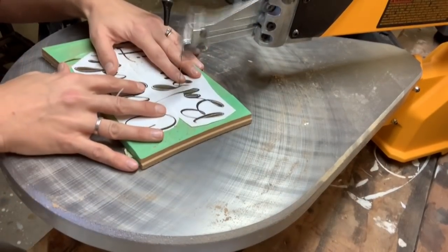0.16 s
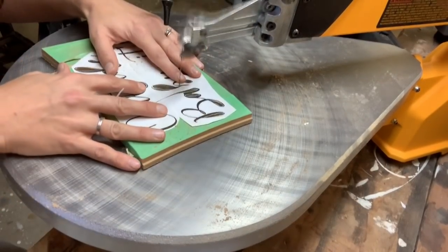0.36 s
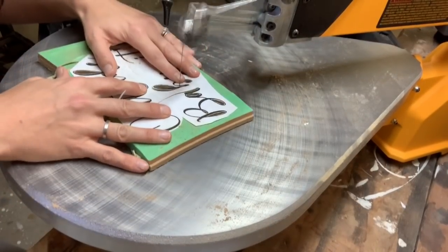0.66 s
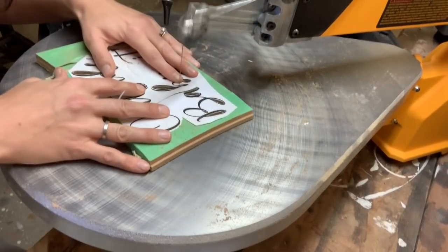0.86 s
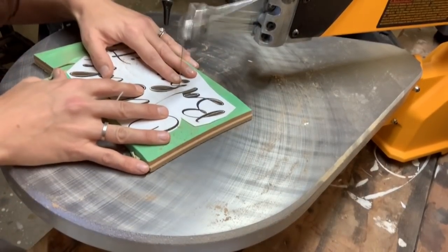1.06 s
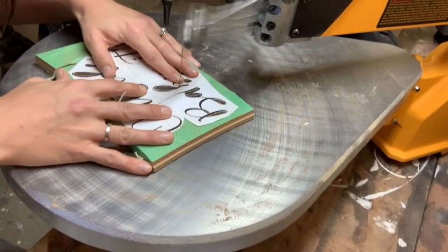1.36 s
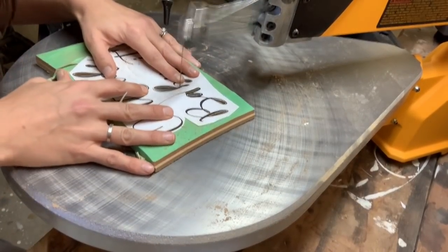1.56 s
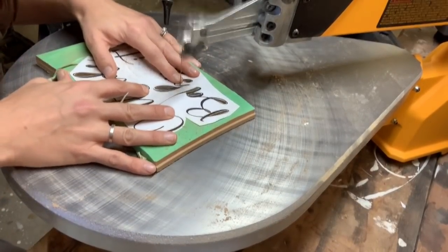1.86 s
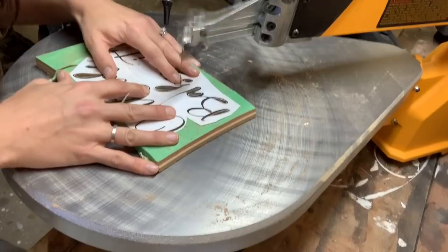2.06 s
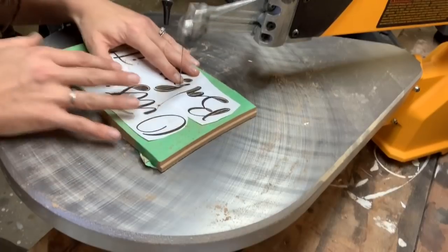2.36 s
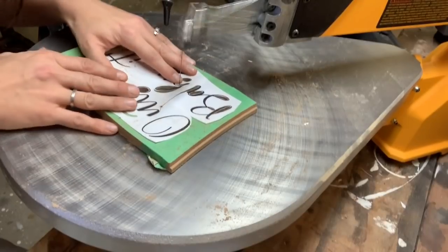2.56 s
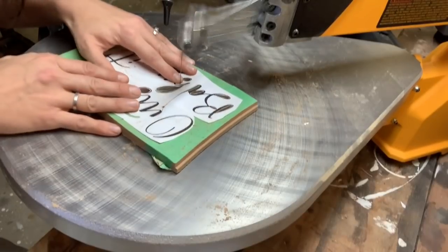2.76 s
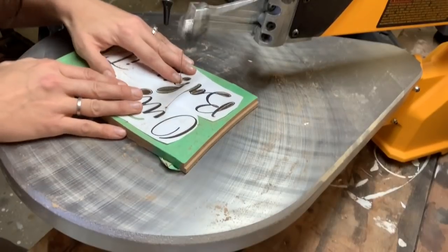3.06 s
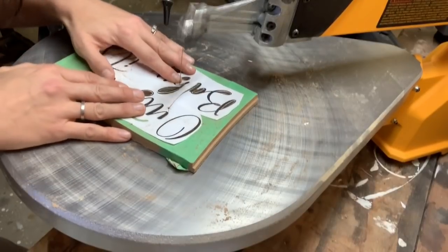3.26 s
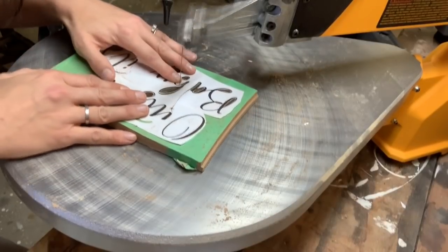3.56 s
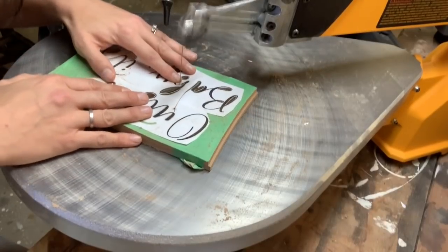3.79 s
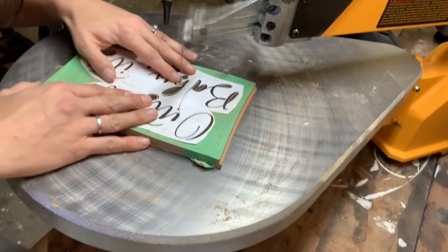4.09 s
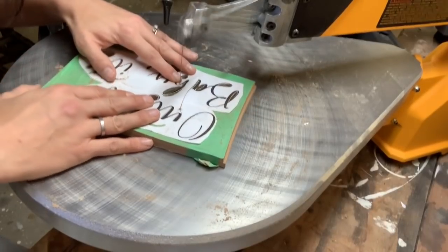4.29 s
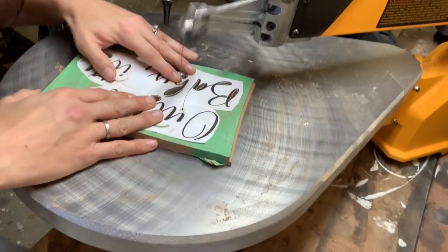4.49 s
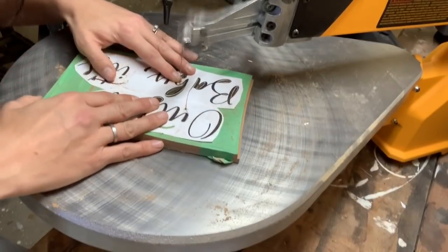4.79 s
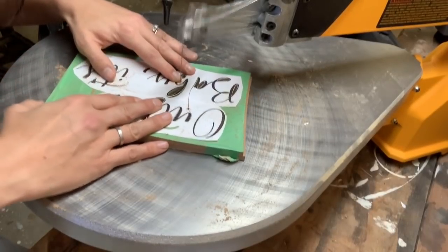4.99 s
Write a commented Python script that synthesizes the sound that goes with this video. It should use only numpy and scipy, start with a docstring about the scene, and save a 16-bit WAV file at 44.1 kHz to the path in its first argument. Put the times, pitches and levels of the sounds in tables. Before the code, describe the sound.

A scroll saw buzzes steadily up close, its fast rattling strokes easing near one second, then rasping through thin wood with brief squeaks.

```python
"""In a workshop, a scroll saw turns over about 24 times a second, close to a stereo microphone.
Crank knocks shake the cast frame as a stack of harmonics, the motor whines on a high multiple of the crank,
and the arm linkage rattles in step as bursts of coloured noise and ringing pivots.
Teeth rasp on each down and up stroke: hardly at all while the feed rests near one second, then steadily.
The board chatters, squeaks and briefly sings, bands of stroke noise pass by, and air washes steadily below."""
import sys
import numpy as np
from scipy import signal
from scipy.fft import rfft, irfft, next_fast_len
from scipy.io import wavfile
from scipy.ndimage import uniform_filter1d, map_coordinates

SR = 44100
rng = np.random.default_rng(int(sys.argv[2]) if len(sys.argv) > 2 else 0)


def transcribe(u):
    """Save the signal u as a 16-bit wav file named by the first command-line argument.

    u: samples, shape (n,) or (channels, n), limited to [-1, 1]; the rate is SR.
    q: integer samples, one column per channel.
    """
    v = np.clip(np.atleast_2d(u).T, -1, 1)
    q = np.round(v * 32767).astype(np.int16)
    wavfile.write(sys.argv[1], SR, q)


N = 226445

# Crank speed. Each row: time in seconds, turns a second.
SPEED = [(0.0, 24.752), (0.35, 24.595), (0.9, 24.684), (1.3, 24.657), (1.7, 24.512), (2.1, 24.361),
         (2.6, 24.433), (3.3, 24.371), (4.2, 24.381), (5.13, 24.373)]
# How fast the board is fed into the teeth. Each row: time in seconds, dB against a steady cut.
FEED = [(0, -11.5), (0.24, -5), (0.6, 1), (0.69, -2.5), (0.78, -12), (1.05, -18), (1.3, -8.5), (1.52, -1.5),
        (1.85, 1), (2.15, 1.5), (2.42, 1), (2.54, -4.5), (2.73, 3.5), (3.0, 2.5), (3.35, -1.3), (4.3, -2),
        (4.9, -1.5), (5.13, 1)]
# How hard the hands bear on board and blade, which loads the drive. Each row: time in seconds, dB.
LOAD = [(0, -5), (1.35, -5), (1.7, 0.9), (2.6, -1), (3.3, 1), (4.4, 3.5), (5.13, 3)]
# The microphone ports lie apart and oppose each other near 9 kHz.
# Each row: Hz, left-right correlation (-1 to 1).
PORTS = [(100, 0.87), (300, 0.61), (500, -0.18), (1000, -0.11), (1400, 0.21), (2400, 0.21), (2850, -0.4),
         (3400, 0.24), (4600, 0.43), (6900, 0.3), (8300, -0.99), (10000, -0.98), (12700, 0.95), (15000, 1)]


def amp(db):
    """Decibels to gain."""
    return 10 ** (np.asarray(db) / 20)


def unit(x):
    """Scale to rms 1."""
    return x / np.sqrt(np.mean(x ** 2) + 1e-20)


def along(points, hz):
    """Read (Hz, value) points on a log axis."""
    f, v = np.transpose(points)
    return np.interp(np.log(hz + 1), np.log(f + 1), v)


def curves(rows):
    """One value per sample for each column after the time."""
    s, *cols = np.transpose(rows)
    return [np.interp(np.arange(N) / SR, s, c) for c in cols]


def wobble(rate):
    """A smooth random curve, rate knots a second."""
    knots = rng.standard_normal(int(N * rate / SR) + 4)
    return map_coordinates(knots, [np.arange(N) * rate / SR])


def swell(middle, length):
    """A smooth rise to 1 and fall; length is taken at half height."""
    return .5 ** ((2 * (np.arange(N) / SR - middle) / length) ** 2)


def swells(rows):
    """The summed dB of (middle, length, dB) swells."""
    return sum(db * swell(middle, length) for middle, length, db in rows)


def effort(steady_db, per_feed, per_load):
    """The level in dB of a sound that follows feed and load, in dB per dB of each."""
    return steady_db + per_feed * curves(FEED)[0] + per_load * curves(LOAD)[0]


def filtered(x, response):
    """x times a response of frequency."""
    m = next_fast_len(N + SR // 2)
    return irfft(rfft(x, m) * response(np.fft.rfftfreq(m, 1 / SR)), m)[..., :N]


def radiate(pair, spectrum, left_db, direct=0.46):
    """Colour two excitations and spread them over the ports, at rms 1; left_db is left against right."""
    def angle(hz):
        return np.arccos(np.clip(along(PORTS, hz), -1, 1)) / 2

    # reflections make the same sound lead at one port or the other, differently for each frequency and source
    leads = rng.standard_normal(200)
    lead_hz = np.linspace(0, SR / 2, len(leads))
    turned = filtered(pair[0], lambda hz: 1j * np.sign(np.interp(hz, lead_hz, leads)))
    share = np.clip(direct, 0, 1)
    pair = np.array([pair[0], np.sqrt(share) * turned + np.sqrt(1 - share) * pair[1]])
    mid, side = filtered(pair, lambda hz: amp(along(spectrum, hz)) * [np.cos(angle(hz)), np.sin(angle(hz))])
    return unit(np.array([mid + side, mid - side]) * amp([[left_db], [0]]))


def contacts(turns, repeat, spiky_db, memory_s, size=1800):
    """Tiny impacts: a share recurs at the same crank angle and slowly wears into a new pattern, the rest is fresh."""
    place = (turns % 1 * size).astype(int)
    age = np.arange(N) / SR / max(memory_s, .1)
    era, blend = age.astype(int), age % 1 * np.pi / 2
    patterns = rng.standard_normal((2, 64, size))
    recurring = np.cos(blend) * patterns[:, era, place] + np.sin(blend) * patterns[:, era + 1, place]
    fresh = unit(rng.standard_normal((2, N)) * amp(spiky_db * wobble(1500)))
    share = np.clip(repeat, 0, 1)
    return np.sqrt(share) * recurring + np.sqrt(1 - share) * fresh


def strokes(turns, first, second, width, second_db, rest_db, scatter_db):
    """Two bursts a turn, centred on the given crank angles (turns), each of a slightly new strength and shape."""
    angle = turns + .006 * wobble(60)

    def burst(centre):
        offset = (angle - centre + .5) % 1 - .5
        return np.exp(-np.abs(offset / width) ** 3)

    envelope = burst(first) + amp(second_db) * burst(second) + amp(rest_db)
    return unit(envelope * amp(scatter_db * wobble(50)))


def ring(x, t60, wet_db):
    """The board and the metal table ring on briefly, in many close modes heard as a decaying noise tail."""
    t = np.arange(SR // 5) / SR
    tail = rng.standard_normal((2, len(t))) * amp(-60 * t / t60)
    tail /= np.linalg.norm(tail[0])
    return unit(x + amp(wet_db) * signal.fftconvolve(x, tail, axes=1)[:, :N])


def narrow(pair, hz, width):
    """One resonance of rms 1 whose frequency may move."""
    carrier = np.exp(2j * np.pi * np.cumsum(hz * np.ones(N)) / SR)
    pole = np.exp(-np.pi * width * 1.5 / SR)
    # shift the resonance down to 0 Hz, smooth it there with a double pole, and shift it back
    smoothed = signal.lfilter([1], np.poly([pole, pole]), pair / carrier)
    return unit(np.real(smoothed * carrier))


def resonate(pair, modes, shift_db, rate):
    """Narrow resonances, each waxing and waning by itself, spread over the ports at rms 1."""
    out = sum(amp(db + shift_db * wobble(rate)) * narrow(pair, centre, width) for centre, width, db in modes)
    return radiate(out, [(1000, 0)], left_db=1.5)


def frame(turns, scatter, waver_db, stir, ring_order=5):
    """Crank knocks shake the frame at multiples of its speed; the motor's supply ripple beats slowly with them."""
    # Shakes of frame and motor. Each row: multiple of the crank speed, left dB, right dB.
    shakes = [(1, -55, -44.5), (2, -43, -36), (3, -42.5, -40), (4, -47.5, -47), (5, -43, -31.5),
              (6, -39.5, -40.5), (7, -67, -36.5), (8, -39.5, -42), (9, -49.5, -43), (10, -47, -57.5),
              (11, -54, -48), (12, -46, -54), (13, -48.5, -61), (14, -44, -63), (15, -60, -87),
              (16, -46, -64), (17, -44, -59), (18, -38, -79), (19, -50.5, -55), (22, -61, -52),
              (23, -50.5, -49), (24, -50, -68), (25, -51, -58), (27, -61, -50), (28, -51.5, -66)]
    # Load shifts the shakes. Each row: multiple of the crank speed, dB in a steady cut, dB per dB of load.
    strain = [(2, -0.5, 0), (4, -1, -0.9), (5, 0.5, 0.36), (6, 0, -0.3), (7, -3, 0), (8, -0.5, 0.77),
              (9, -1.5, 0.5), (22, -1, 0), (32, -2, 0.5)]
    # A shake swells or ebbs for a moment. Each row: middle in seconds, length in seconds, multiple, dB.
    surges = [(0.82, 0.25, 2, -5), (1.33, 0.36, 2, 2), (2.33, 0.23, 2, -8), (2.95, .25, 2, -3),
              (1.5, 0.22, 6, -5), (2.18, 0.2, 6, -14), (2.24, 0.5, 7, 5.5), (1.4, 0.52, 5, 2),
              (3.06, 0.35, 5, 2.5), (2.31, 0.34, 5, 2.5), (0.4, 0.62, 16, 3)]
    # Shakes that throb with the slow beat.
    # Each row: multiple of the crank speed, depth (negative = against the beat).
    ripple = [(4, 0.27), (5, 0.18), (6, 0.34), (7, 0.067), (9, 0.14), (17, -0.0074), (18, 0.031),
              (22, -1.2)]
    # Knocks of the drive in each turn. Each row: crank angle in turns, dB.
    knock_angles = [(.09, 0), (.28, -1), (.47, -8), (.715, -1)]
    # Steady hum of the motor and its stand. Each row: Hz, dB.
    hum = [(67.6, -44.5), (78.5, -55), (240, -53)]
    ripple_hz, in_step_s = 120, 4.37  # the ripple is in step with the fifth multiple at that moment

    out = np.zeros((2, N))
    t = np.arange(N) / SR
    load_db = curves(LOAD)[0]
    strain_db = {round(k): db + slope * load_db for k, db, slope in strain}
    throb = {round(k): depth for k, depth in ripple}
    beat = 5 * turns - ripple_hz * t
    beat = 2 * np.pi * (beat - np.interp(in_step_s, t, beat))
    slack = amp(-.6 * load_db)
    weight_db = .7 * slack * wobble(24)
    for order, left_db, right_db in shakes:
        k = round(order)
        lag = np.arccos(np.clip(along(PORTS, k * SPEED[-1][1]), -1, 1))
        # multiples far from the frame's main ring arrive less in step; higher ones flutter more
        loose = np.sqrt(k) * slack
        push = sum(amp(db) * np.exp(2j * np.pi * (1 / 4 - k * angle)) for angle, db in knock_angles)
        offset = scatter * abs(k - ring_order) * rng.normal()
        phase = np.angle(push) + 2 * np.pi * (k * turns + offset) + stir * loose * wobble(15)
        surge_db = swells([(s, length, db) for s, length, multiple, db in surges if round(multiple) == k])
        level = amp(strain_db.get(k, 0) + surge_db + weight_db + waver_db * loose * wobble(10))
        phase = np.array([phase, phase + lag])
        shake = np.sin(phase) + throb.get(k, 0) * np.sin(phase - beat)
        out += amp([[left_db], [right_db]]) * level * shake
    for hz, db in hum:
        out += amp(db) * np.sin(2 * np.pi * (hz * t + rng.random()) + .3 * wobble(4))
    return np.sqrt(2) * out  # table levels are rms


def whine(turns, order=32):
    """The motor whines on one high multiple of the crank, swelling each time it reverses the arms."""
    # One row: dB in a steady cut, dB per dB of load, depth of the throb twice a turn.
    whine_law = (-38.7, .4, .35)
    steady_db, per_load, depth = whine_law
    load_db = curves(LOAD)[0]
    throb = 1 + depth * np.cos(4 * np.pi * (turns - .18)) + depth / 2 * np.cos(2 * np.pi * (turns - .7))
    # it wavers more while the drive runs slack
    phase = 2 * np.pi * order * turns + .25 * amp(-load_db) * wobble(14)
    level = amp(steady_db + per_load * load_db + 0.7 * wobble(10))
    return np.sqrt(2) * level * throb * np.sin([phase, phase + 1.33])


def linkage(turns):
    """The arm pivots knock as the blade reverses at top and bottom; the arms ring and the pivots jingle with it."""
    # Colour of the knocks. Each row: Hz, relative dB.
    knock_colour = [(45, -30), (75, -7), (110, -1), (220, -3), (330, -2), (440, 2), (475, -6), (515, -9),
                    (550, 3), (700, 1), (840, 1), (950, -3), (1500, -6), (1900, -11), (3000, -19),
                    (8000, -37)]
    # Jingling of the loose pivots. Each row: Hz, width in Hz, dB.
    pivots = [(1200, 280, -9), (1807, 75, -0.5), (2112, 74, -1), (2415, 100, -10), (2970, 190, -12),
              (3384, 150, -2.5)]
    knocks = strokes(turns, first=0.19, second=0.72, width=0.084, second_db=1.5, rest_db=-3, scatter_db=2.5)
    play = contacts(turns, repeat=0.59, spiky_db=3.0, memory_s=1.52)
    rattle = radiate(knocks * play, knock_colour, left_db=-1.0)
    arm_hz = 432 * (1 + 0.03 * wobble(7))
    arm_modes = [(arm_hz, 24, 3), (565, 40, -2), (700, 70, -3)]  # Hz, width in Hz, dB
    arms = resonate(knocks * rng.standard_normal((2, N)), arm_modes, shift_db=1.8, rate=15)
    jingle_hits = knocks * contacts(turns, repeat=.4, spiky_db=4, memory_s=0.93)
    jingle = resonate(jingle_hits, pivots, shift_db=2.5, rate=12)
    # the pivots rattle more freely until the cut loads them
    slack_db = -.25 * curves(LOAD)[0]
    return amp(slack_db) * (amp(-38.5) * rattle + amp(-45) * arms + amp(-47) * jingle)


def shop():
    """A steady wash of air from the motor and the room: coloured noise."""
    # Colour of the air. Each row: Hz, relative dB.
    air_colour = [(15, -20), (40, -14), (100, -2), (300, -3), (450, -2), (505, -8), (570, 0), (1100, -2),
                  (3000, -17), (8000, -27), (15000, -49)]
    return amp(-44.5) * radiate(rng.standard_normal((2, N)), air_colour, left_db=-5.5)


def grain(pair, patchy_db):
    """The uneven wood gives each stroke a colour of its own."""
    z = signal.stft(pair, nperseg=256)[2]
    field = uniform_filter1d(rng.standard_normal(z.shape[1:]), size=4, axis=0)  # smooth over frequency
    field = uniform_filter1d(field, size=6, axis=1)  # and over time
    return signal.istft(z * amp(patchy_db * unit(field)), nperseg=256)[1][:, :N]


def blade_modes(turns, bend=0.014, wander=.007):
    """The blade's resonances follow its twist, shift a little through each stroke and wander with the grain."""
    # Low, middle and high resonance of the taut blade. Each row: width in Hz, dB, dB per dB of load.
    blade = [(200, -3.5, 1.3), (170, 0.5, 0), (380, 1.5, 0)]
    # The board twists the blade and the wood damps it.
    # Each row: time in seconds, low Hz, middle Hz, high Hz, dB added to the middle one.
    twist = [(0, 3450, 5130, 5900, 1.5), (0.6, 3490, 5170, 6170, -0.5), (1.45, 3460, 5150, 6230, 2.5),
             (2.1, 3680, 4890, 6100, 2), (2.35, 3450, 5000, 6100, 1.5), (2.75, 3580, 4990, 6480, 1.5),
             (3.2, 3380, 5130, 6290, -4), (3.9, 3600, 4930, 6500, -2), (4.5, 3780, 5200, 7000, -3),
             (5.13, 3620, 4930, 6400, -2)]
    load_db = curves(LOAD)[0]
    *pitches, middle_db = curves(twist)
    tension = 1 - bend * np.sin(4 * np.pi * (turns - .44))
    return [(hz * (tension + wander * wobble(25)), width, db + slope * load_db + added_db)
            for hz, (width, db, slope), added_db in zip(pitches, blade, [0, middle_db, 0])]


def cut(turns):
    """Teeth tear fibres when the blade moves fastest, in mid-stroke; it rings, scrapes the kerf and spits dust."""
    # Colours of rasp, scrape and dust. Each row: Hz, relative dB.
    teeth_colour = [(2500, -49), (4200, -15), (4900, 0), (5600, 2.5), (6700, 3.5), (7400, -8), (8200, -30),
                    (10000, -65)]
    kerf_colour = [(1800, -14.5), (2850, -14.5), (3300, -3.5), (3600, 0), (4000, -3.5), (4550, -3.5),
                   (5300, -5), (9000, -36)]
    dust_colour = [(6500, -10), (7700, -3.5), (8300, 8), (9300, -2.5), (10000, -8), (11500, -12.5),
                   (13500, -12.5), (15000, -46), (15700, -52)]
    # The teeth catch or miss for a stroke. Each row: middle in seconds, length in seconds, dB more rasp.
    catches = [(0.04, 0.016, -1), (1.235, 0.018, 5.5), (1.275, 0.017, 3), (1.31, .03, -6)]
    # The blade binds in the kerf. Each row: middle in seconds, length in seconds, dB more scrape.
    binds = [(0.48, 0.13, 4), (0.67, 0.096, 9.5), (1.68, 0.16, 3.5), (2.08, 0.15, 5), (3.82, 0.33, 5)]
    rasp_db = effort(steady_db=-30.5, per_feed=1, per_load=0) + swells(catches)
    scrape_db = effort(steady_db=-36, per_feed=0.55, per_load=1.38) + swells(binds)
    # with little feed the return stroke barely touches the wood
    return_db = -1.6 + 0.73 * np.minimum(curves(FEED)[0] + 9, 0)
    bite = strokes(turns, first=0.43, second=0.915, width=0.128,
                   second_db=return_db, rest_db=-11.5, scatter_db=.7)
    rub = strokes(turns, first=0.446, second=0.93, width=0.115, second_db=-1.5, rest_db=-4.5, scatter_db=1.1)
    teeth = bite * contacts(turns, repeat=.6, spiky_db=1.5, memory_s=.4)
    flanks = rub * contacts(turns, repeat=0.62, spiky_db=3.0, memory_s=0.492)
    teeth, flanks = [grain(ring(x, t60=.05, wet_db=-9), patchy_db=2.9) for x in (teeth, flanks)]
    flying = bite * amp(1.6 * wobble(130)) * contacts(turns, repeat=0.35, spiky_db=3, memory_s=0.3)
    chips = ring(flying, t60=0.057, wet_db=-2.5)
    plucks = bite * amp(1.6 * wobble(150)) * contacts(turns, repeat=0.33, spiky_db=-0.5, memory_s=0.289)
    # a blade under light load rings freely; a heavier load favours rasp over ring
    free_db = np.clip(rasp_db - scrape_db - 3.5, -3, 6)
    dust_db = rasp_db - 4.0 - 0.042 * free_db + 0.16 * curves(LOAD)[0]
    rasp = amp(rasp_db - 2.5 - 0.61 * free_db) * radiate(teeth, teeth_colour, left_db=-3.5)
    zing = amp(rasp_db - 5.5 + 0.4 * free_db) * resonate(plucks, blade_modes(turns), shift_db=1.5, rate=24)
    scrape = amp(scrape_db - 0.12 * free_db) * radiate(flanks, kerf_colour, left_db=-2.5)
    dust = amp(dust_db) * radiate(chips, dust_colour, left_db=-0.5)
    return rasp + zing + scrape + dust


def board(turns):
    """The blade tugs at the board, which chatters on the table, squeaks in the turns and sings with the strokes."""
    # Colour of the chatter. Each row: Hz, relative dB.
    chatter_colour = [(500, -12), (1050, -5.5), (1350, 2), (1550, 2.5), (1850, 0.5), (2080, -5.5),
                      (2550, -1.5), (2720, -10.5), (2950, -6.5), (3200, -1.5), (4000, -36)]
    # Resonances of the kerf pinching the blade. Each row: Hz, width in Hz, dB.
    pinch = [(2154, 47, -4.5), (2271, 63, -1.5), (2410, 74, -2), (2532, 110, -1.5)]
    # The board is swung round and the kerf pinches the blade.
    # Each row: middle in seconds, length in seconds, dB more squeak.
    swings = [(2.0, 0.62, 9), (3.2, 2.1, 2.5), (5.05, 0.16, 8)]
    # Passing bands of stroke noise: narrow rows are squeals or a ringing blade, wide rows a breathy scrape.
    # Each row: middle in seconds, length in seconds, Hz, width in Hz, dB.
    passing_bands = [(2, 0.76, 1820, 41, -43.5), (2.53, 0.28, 1600, 30, -44.5),
                     (2.04, 0.097, 2590, 70, -36), (2.48, 0.21, 2530, 80, -51),
                     (2.06, .2, 2940, 150, -38.5), (3.65, 0.95, 1500, 18, -47.5),
                     (3.67, 0.46, 2520, 65, -43.5), (2.8, 2.1, 2700, 450, -45),
                     (0.58, 0.27, 3520, 190, -41), (0.6, 0.3, 2720, 430, -46), (4.55, 0.79, 4480, 380, -39),
                     (5.03, 1.35, 1810, 220, -40)]
    # The board sings briefly.
    # Each row: middle in seconds, length in seconds, multiple of the crank speed, dB.
    sing = [(2.126, 0.079, 48, -38), (2.05, 0.18, 56, -47), (2.36, 0.47, 56, -42.5),
            (2.39, 0.14, 62, -35.5), (3.0, 0.076, 62, -39), (3.765, 0.21, 62, -34.5),
            (3.92, 0.22, 56, -38.5), (4.36, 0.2, 62, -39.5), (4.83, 0.45, 62, -41)]
    sing_rest_db = -55.5  # each singing tone between its swells
    squeak_db = effort(steady_db=-42.5, per_feed=1, per_load=0.085) + swells(swings)
    chatter_db = effort(steady_db=-36, per_feed=0.22, per_load=0.79)
    tugs = strokes(turns, first=.48, second=.93, width=.12, second_db=-.5, rest_db=-4, scatter_db=.9)
    taps = ring(tugs * contacts(turns, repeat=0.53, spiky_db=2.5, memory_s=0.595), t60=0.066, wet_db=-3.0)
    out = amp(chatter_db) * radiate(taps, chatter_colour, left_db=-0.8)
    slips = tugs * contacts(turns, repeat=.3, spiky_db=2.5, memory_s=.3)
    out += amp(squeak_db - 3.5) * resonate(slips, pinch, shift_db=1.5, rate=9)
    shared_slips = slips + slips[::-1] / 2  # each side leaks into the other
    for middle, length, hz, width, db in passing_bands:
        out += amp(db) * swell(middle, length) * narrow(shared_slips, hz, width)
    for order in sorted({round(row[2]) for row in sing}):
        swelling = sum(amp(db) * swell(s, length) for s, length, k, db in sing if round(k) == order)
        phase = 2 * np.pi * order * turns + .5 * wobble(9.7)
        out += (amp(sing_rest_db) + swelling) * np.sin([phase, phase + 0.81])
    return out


def scene():
    """One crank drives the frame, whine, linkage, cut and board, over the steady air of the shop."""
    turns = np.cumsum(curves(SPEED)[0]) / SR
    shake = frame(turns, scatter=.035, waver_db=.3, stir=.05)
    return shake + whine(turns) + linkage(turns) + shop() + cut(turns) + board(turns)


def record(dry):
    """The microphone drops the lowest rumble, and the recorder keeps nothing above its band limit."""
    top_hz = 15700
    return filtered(dry, lambda hz: np.clip(hz / 20, 0, 1) ** 2 * (hz < top_hz))


dry = scene()
out = record(dry)
transcribe(out)
```